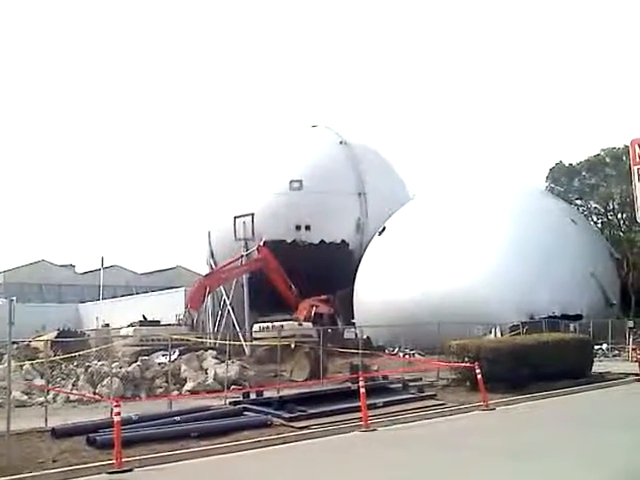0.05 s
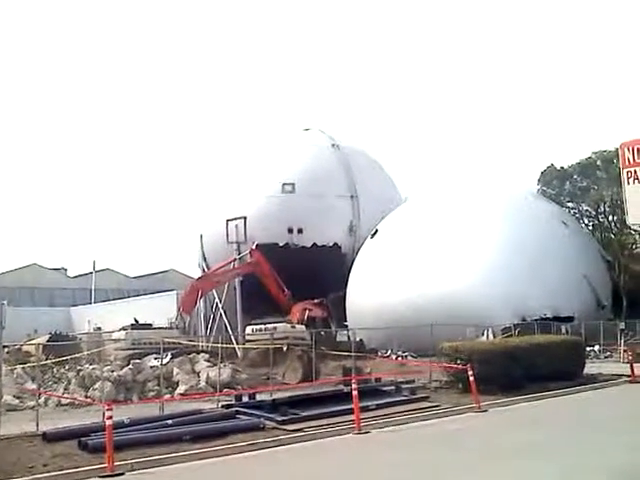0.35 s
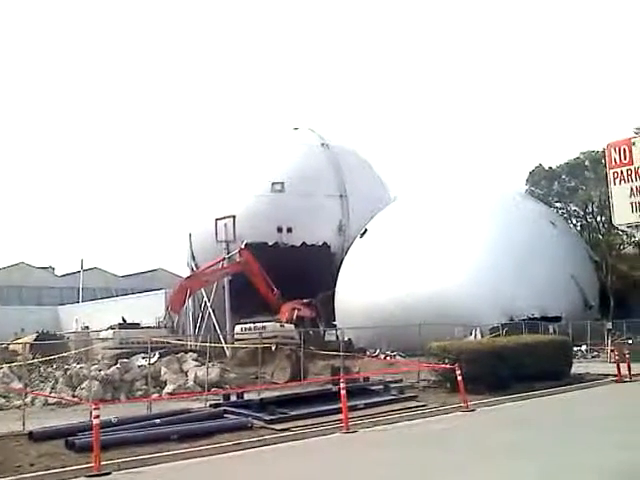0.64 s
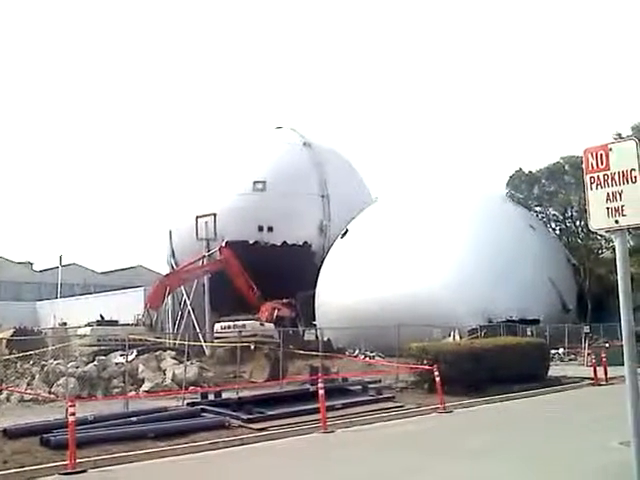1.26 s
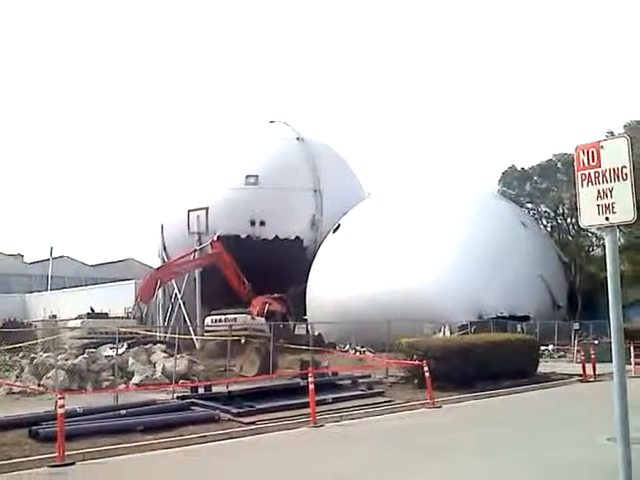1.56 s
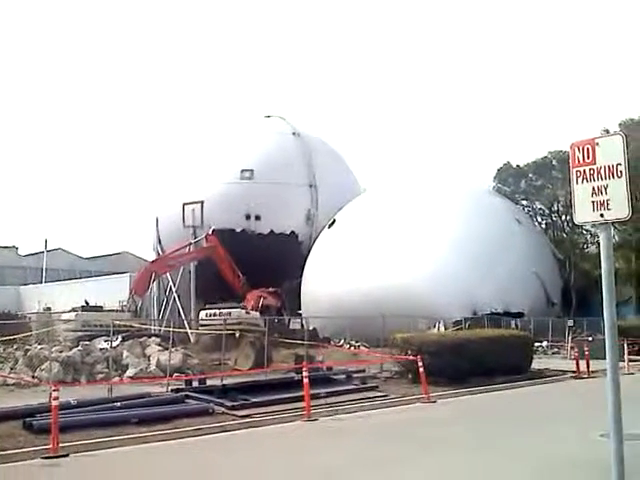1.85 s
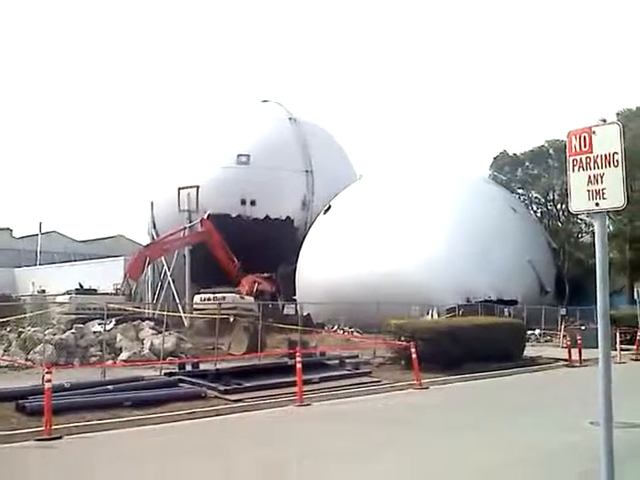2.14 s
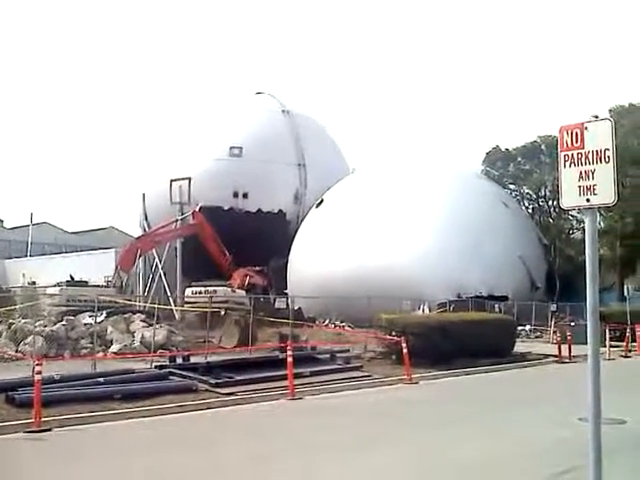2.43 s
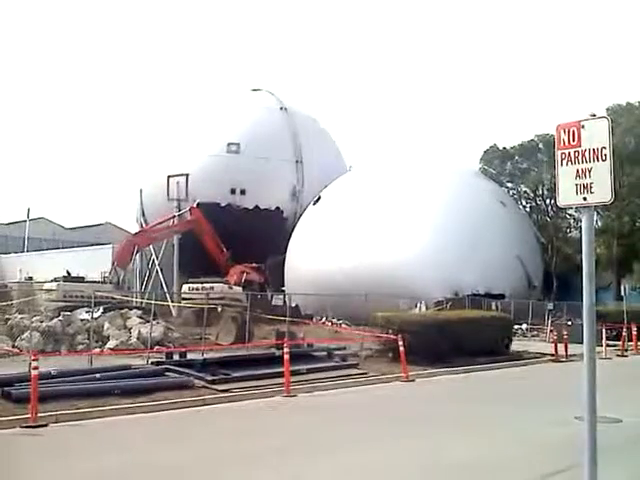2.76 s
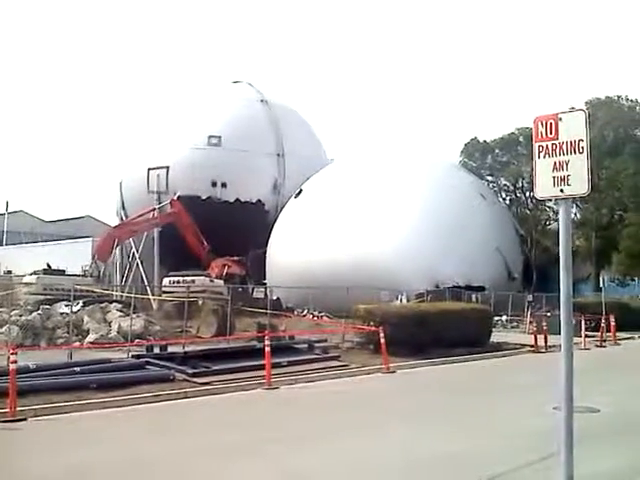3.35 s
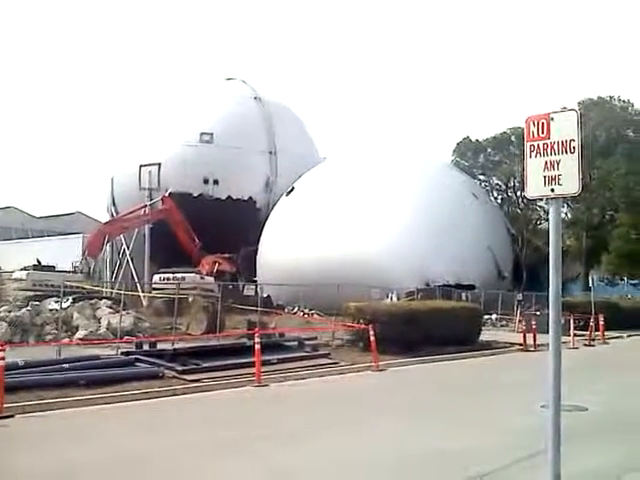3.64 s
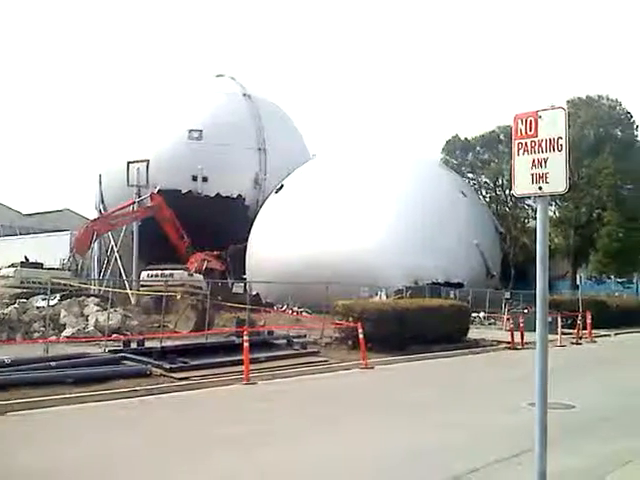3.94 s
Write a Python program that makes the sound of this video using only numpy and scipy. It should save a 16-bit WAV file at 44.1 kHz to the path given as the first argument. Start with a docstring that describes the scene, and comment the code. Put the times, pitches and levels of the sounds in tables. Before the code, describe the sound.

A huge hollow steel sphere booms and crashes under an excavator, with scraping and engine drone.

```python
"""A huge hollow steel sphere booms, clangs and crashes as an excavator tears at it across a demolition yard.
Bending waves in the shell bring the treble first, then rattle round it. Steel scrapes and squeals,
loose scrap clanks, and the machine drones and clatters behind it all.
Heard through one narrow-band camera microphone, which overloads on the loudest blows."""
import sys
import numpy as np
from scipy.fft import rfft, irfft, next_fast_len
from scipy.io import wavfile
from scipy.ndimage import map_coordinates

SR = 44100
rng = np.random.default_rng(int(sys.argv[2]) if len(sys.argv) > 2 else 0)


def digitize_waveform(pressure):
    """Quantize a signal to 16-bit integers and store it at the path in sys.argv[1].

    Rows of a 2-D input are taken as channels; values are limited to [-1, 1].
    """
    field = np.atleast_2d(pressure).T
    bounded = np.clip(field, -1, 1)
    quanta = np.round(bounded * 32767).astype(np.int16)
    wavfile.write(sys.argv[1], SR, quanta)


N = 176400

# How hard the excavator works. Each row: time in seconds, clatter level in dB, engine level in dB.
EFFORT = [(0, -25.5, -34.5), (.09, -24, -30), (.5, -24.5, -27.5), (.8, -24.5, -25), (1.1, -23.5, -25),
          (1.9, -21.5, -26.5), (2.5, -17.5, -26), (3.0, -19.5, -27), (3.5, -19.5, -26), (4, -20.5, -28)]
# Spectra of the diesel's roar and the machine's clatter. Each row: frequency in Hz, relative level in dB.
ROAR_SPECTRUM = [(20, -27.5), (55, -11), (120, -7.5), (200, -6), (280, 0), (400, 0), (580, -0.5),
                 (750, -0.5), (1150, -2), (1700, -4.5), (3000, -20.5), (6000, -66)]
CLATTER_SPECTRUM = [(400, -27.5), (1000, -14), (1600, -6), (2100, 2.5), (2650, 2), (2950, -1.5),
                    (3400, -1.5), (5000, -8)]
# The diesel's drone. Each row: pitch in Hz, level in dB at average effort.
DRONE_LINES = [(264, -40.5), (296, -41.5), (583, -41), (1195, -48.5)]
# Loose scrap. Each row: start in seconds, peak in dB, centre pitch in Hz, seconds to fall 60 dB.
CLANKS = [(.115, -9.5, 823, 0.047), (.126, -11.5, 2620, 0.019), (.16, -12.5, 2070, .03),
          (.232, -12.5, 2340, 0.046), (.775, -15, 313, 0.072), (1.135, -12, 1011, .08),
          (1.516, -10.5, 554, .06), (2.028, -8.5, 2705, 0.064), (2.474, -9.5, 2210, .03),
          (3.164, -16, 301, 0.07), (3.225, -10, 1770, 0.045), (3.342, -22.5, 2240, 0.026),
          (3.458, -10, 2290, 0.079), (3.808, -4, 2450, 0.02), (3.864, -9, 2573, 0.044),
          (3.921, -8.5, 1756, 0.067), (3.981, -10, 2307, 0.043)]
# Steel dragged over steel. Each row: midpoint and length in seconds, level in dB, band centre in Hz.
SCRAPES = [(0.422, 0.17, -25, 3180), (0.548, 0.15, -23, 2670), (.76, 0.33, -26, 2620),
           (3.579, 0.17, -24, 2530), (3.71, 0.1, -24, 2755)]
# The course of the squeal. Each row: time in seconds, pitch in Hz, level in dB.
SQUEAL = [(0, 2581, -11), (.05, 2570, -14.5), (.072, 2560, -22.5), (.1, 2570, -12.5), (.15, 2583, -32),
          (.24, 2570, -26), (.32, 2580, -44), (.44, 2578, -31.5), (.55, 2574, -24.5), (.78, 2571, -25),
          (.92, 2578, -42.5), (1.0, 2573, -26.5), (1.15, 2575, -41.5), (3.48, 2580, -52.5),
          (3.53, 2577, -22), (3.67, 2575, -19), (3.83, 2575, -19.5), (3.88, 2580, -35), (4, 2580, -33)]
# Blows on the sphere. Each row: start in seconds, then thump, boom, clang and crash levels in dB.
BLOWS = [(.078, -33, -15.5, -18, -21.5), (.25, -39, -18.5, -40, -48), (1.088, -39, -15.5, -22, -23),
         (1.15, -30, -19.5, -12.5, -18.5), (1.183, -27.5, -20.5, -7.5, -15.5),
         (1.345, -41.5, -21, -18, -24), (2.016, -19, -15.5, -12, -2.5), (2.11, -27, -33, -21.5, -6),
         (2.21, -33, -22.5, -23, -15)]
# The shell's four registers. Each row: frequency in Hz, relative level in dB.
THUMP_SPECTRUM = [(12, -25), (35, -9), (70, 2), (140, -5), (220, -2), (500, -40), (2000, -88)]
BOOM_SPECTRUM = [(30, -36), (120, -17), (220, -5), (310, -0.5), (420, 1), (600, -31.5), (1200, -43.5),
                 (4000, -88)]
CLANG_SPECTRUM = [(200, -27.5), (380, -14), (460, 0), (580, 1), (700, -8), (830, -7), (1030, -4),
                  (1400, -12.5), (2500, -34.5), (6000, -86.5)]
CRASH_SPECTRUM = [(100, -52.5), (350, -11), (600, -10.5), (790, -1.5), (1000, -8), (1500, -5.5), (2000, 1),
                  (2600, 0.5), (3000, -2.5), (3400, -2.5), (4200, -11.5), (6000, -64)]
# Resonances among the shell's dense modes. Each row: frequency in Hz, width in Hz, relative strength in dB.
SHELL_RESONANCES = [(314, 9.3, 7), (476.6, 29, -0.5), (558.4, 18, 3.5), (610.3, 13, 4), (829, 90, 1.5),
                    (963, 4.7, 3.5)]
# The microphone's response before and after the overload. Each row: frequency in Hz, gain in dB.
MIC_ROLLOFF = [(3400, 0.5), (3650, -7), (4000, -15.5), (4350, -25), (4700, -52), (5200, -96)]
OUTPUT_COLOUR = [(4000, 0.5), (8000, -2), (11000, -0.5), (15500, -1)]


def amp(db):
    return 10 ** (np.asarray(db) / 20)


def unit(x):
    return x / np.sqrt(np.mean(x ** 2) + 1e-20)


def seconds():
    return np.arange(N) / SR


def colour(points):
    """Gain against frequency from (Hz, dB) points on a log axis."""
    f, db = np.transpose(points)
    return lambda hz: amp(np.interp(np.log(hz + 1), np.log(f + 1), db))


def curves(rows):
    """One value per sample for each column after the time."""
    times, *columns = np.transpose(rows)
    return [np.interp(seconds(), times, column) for column in columns]


def wobble(rate):
    """A smooth random curve through rate points a second."""
    return map_coordinates(rng.standard_normal(N // 40), [seconds() * rate], mode="wrap")


def filtered(x, response):
    """x through a complex frequency response."""
    size = next_fast_len(N + SR // 2)
    return irfft(rfft(x, size) * response(np.fft.rfftfreq(size, 1 / SR)), size)[:N]


def impacts(per_s):
    """Random tiny knocks, rms 1."""
    return unit(rng.standard_normal(N) * (rng.random(N) < per_s / SR))


def tone(hz):
    """A sine of rms 1 on a pitch curve."""
    return np.sqrt(2) * np.sin(2 * np.pi * np.cumsum(hz) / SR)


def excavator():
    """Across the yard, the diesel roars and drones under the clatter of the working machine."""
    clatter_db, engine_db = curves(EFFORT)
    roar = unit(filtered(rng.standard_normal(N), colour(ROAR_SPECTRUM)))
    roar *= amp(engine_db + 1.74 * wobble(18))
    drone = sum(tone(hz * (1 + 0.01232 * wobble(12))) * amp(db + 2.1 * wobble(8.3))
                for hz, db in DRONE_LINES)
    drone *= amp(engine_db - engine_db.mean())
    clatter = unit(filtered(impacts(per_s=5000), colour(CLATTER_SPECTRUM)))
    clatter *= amp(clatter_db + 1.1 * wobble(35))
    return roar + drone + clatter


def loose_scrap(mode_count=12, mode_spread=0.18, attack_cycles=0.51):
    """Loose pieces knock together, each ringing briefly in a cluster of modes."""
    out, t = np.zeros(N + SR), np.arange(SR // 8) / SR
    for start, peak_db, hz, t60 in CLANKS:
        modes_hz = hz * np.exp(mode_spread * rng.standard_normal((mode_count, 1)))
        phases = rng.random((mode_count, 1))
        envelope = (1 - np.exp(-t * hz / attack_cycles)) * amp(-60 * t / t60)
        ring = np.sin(2 * np.pi * (modes_hz * t + phases)).sum(0) * envelope
        out[round(start * SR):][:len(t)] += amp(peak_db) * ring / abs(ring).max()
    return out[:N]


def steel_friction(jitter_hz=17, flutter_db=1.5, half_width_hz=740):
    """Steel drags on steel: one wavering mode squeals, and rough scrapes swell and fade."""
    hz, db = curves(SQUEAL)
    out = tone(hz + jitter_hz * wobble(90)) * amp(db + flutter_db * wobble(60))
    for midpoint, length, level_db, centre_hz in SCRAPES:
        grit = filtered(impacts(per_s=3300), lambda f: 1 / (1 + ((f - centre_hz) / half_width_hz) ** 2))
        swell = np.exp(-(2 * (seconds() - midpoint) / length) ** 2)
        out += unit(grit) * amp(level_db) * swell
    return out


def shell_response(hz, ring_db, travel_s=0.047, reference_hz=1005.4, stiff_hz=450.66):
    """The shell resonates, and its bending waves travel faster with the root of frequency."""
    ring = 1 + sum(amp(db + ring_db) * 1j * hz * width / (centre ** 2 - hz ** 2 + 1j * hz * width)
                   for centre, width, db in SHELL_RESONANCES)
    # Below stiff_hz the curved shell is stiff and the waves stop slowing down.
    phase_lag = 4 * np.pi * travel_s * np.sqrt(reference_hz * (hz + stiff_hz))
    return ring * np.exp(-1j * phase_lag)


def shell_register(spectrum, levels_db, hold_s, early_t60, late_t60, late_db, crumple_db, ring_db):
    """Each blow sends one clean wave through the shell, and from the same instant dense echoes rattle round it."""
    echo_power, first_waves = np.zeros(N), np.zeros(N)
    for (start, *_), db in zip(BLOWS, levels_db):
        onset = round(start * SR)
        # The echoes hold while the steel buckles, drop, then linger in the hollow.
        decay_s = np.maximum(seconds()[:N - onset] - hold_s, 0)
        early = amp(db - 60 * decay_s / early_t60)
        late = amp(db + late_db - 60 * decay_s / late_t60)
        echo_power[onset:] += early ** 2 + late ** 2
        first_waves[onset] = amp(db - 32) * np.sqrt(SR)
    rattle = unit(impacts(per_s=6000) * amp(crumple_db * wobble(35.15)))

    def response(hz):
        gain = colour(spectrum)(hz) * shell_response(hz, ring_db)
        return gain / np.sqrt(np.mean(abs(gain) ** 2))

    return filtered(first_waves + np.sqrt(echo_power) * rattle, response)


def steel_sphere():
    """The struck shell sounds in four registers, from a dull thump up to a bright crash."""
    _, thump_db, boom_db, clang_db, crash_db = np.transpose(BLOWS)
    thump = shell_register(THUMP_SPECTRUM, thump_db, hold_s=0.033, early_t60=0.14, late_t60=1.4,
                           late_db=-13, crumple_db=2.2, ring_db=-4)
    boom = shell_register(BOOM_SPECTRUM, boom_db, hold_s=0.02, early_t60=0.27, late_t60=3.45,
                          late_db=-7, crumple_db=3.9, ring_db=0)
    clang = shell_register(CLANG_SPECTRUM, clang_db, hold_s=0.026, early_t60=0.63, late_t60=2.93,
                           late_db=-8.5, crumple_db=1.98, ring_db=2)
    crash = shell_register(CRASH_SPECTRUM, crash_db, hold_s=0.073, early_t60=0.68, late_t60=1.7,
                           late_db=-9, crumple_db=2.3, ring_db=-9)
    return thump + boom + clang + crash


def scene():
    """The yard as it reaches the microphone, in mono."""
    return (steel_sphere() + steel_friction() + loose_scrap() + excavator())[None]


def record(dry, clip_level=0.66, hardness=20, top_hz=15760):
    """The camera microphone loses the high treble and clips hard on the loudest blows."""
    narrow = filtered(dry[0], colour(MIC_ROLLOFF))
    clipped = narrow / (1 + abs(narrow / clip_level) ** hardness) ** (1 / hardness)
    return filtered(clipped, lambda hz: colour(OUTPUT_COLOUR)(hz) * (hz < top_hz))[None]


dry = scene()
out = record(dry)
digitize_waveform(out)
```